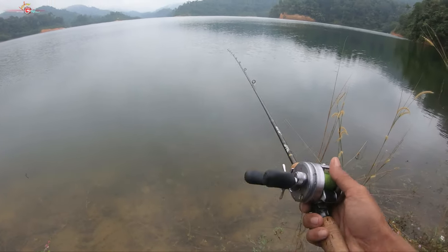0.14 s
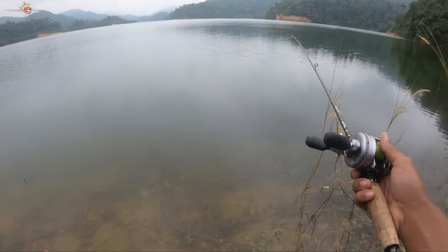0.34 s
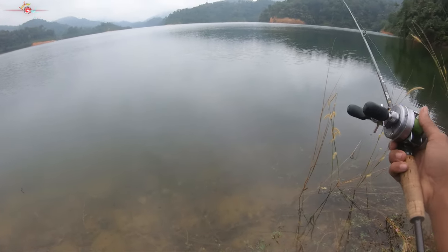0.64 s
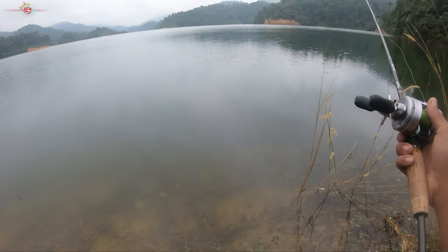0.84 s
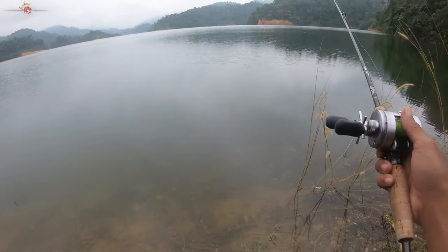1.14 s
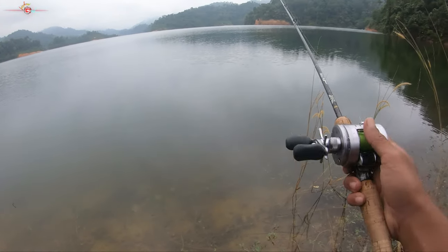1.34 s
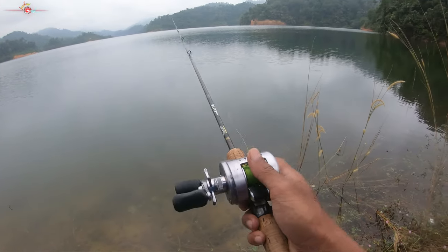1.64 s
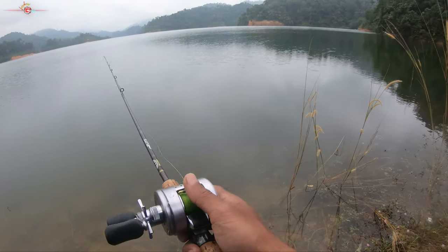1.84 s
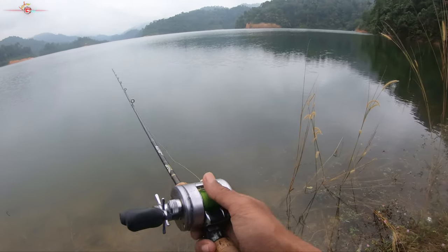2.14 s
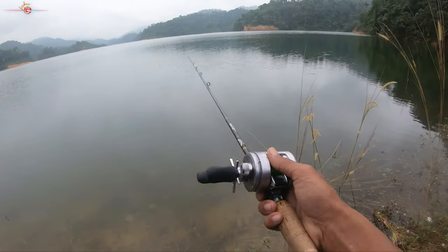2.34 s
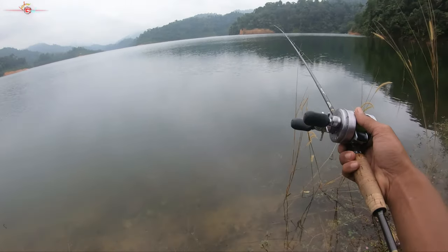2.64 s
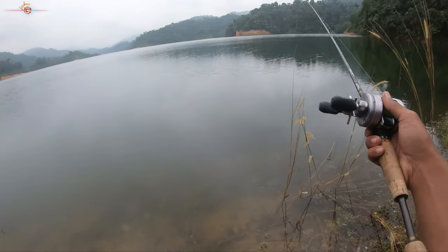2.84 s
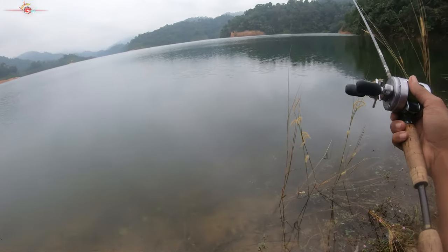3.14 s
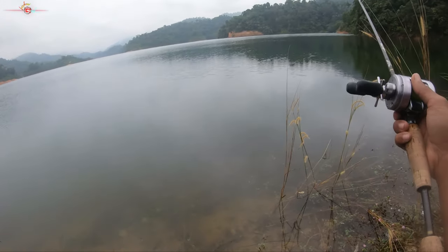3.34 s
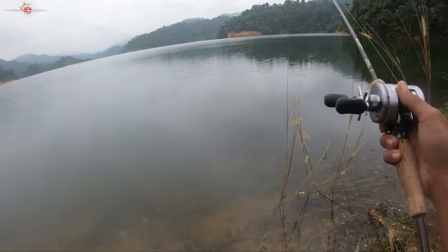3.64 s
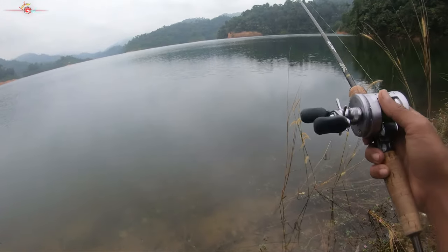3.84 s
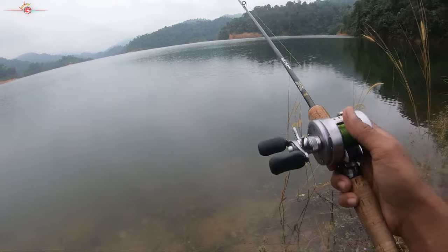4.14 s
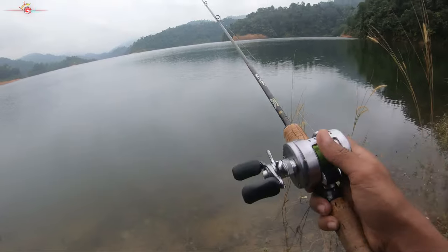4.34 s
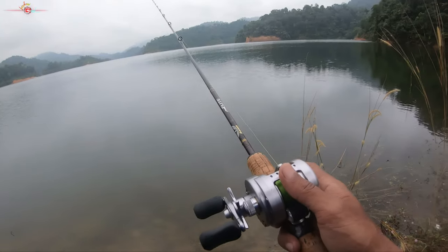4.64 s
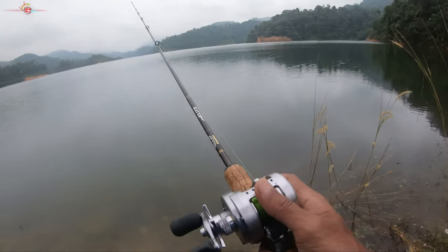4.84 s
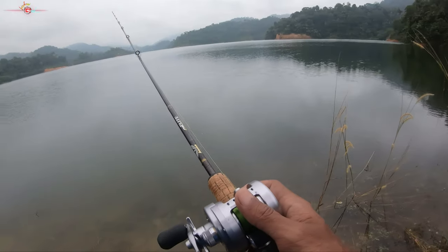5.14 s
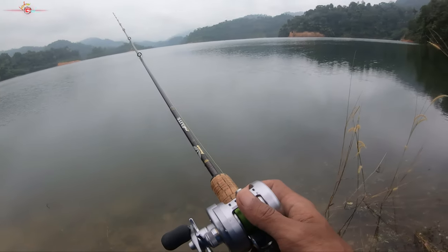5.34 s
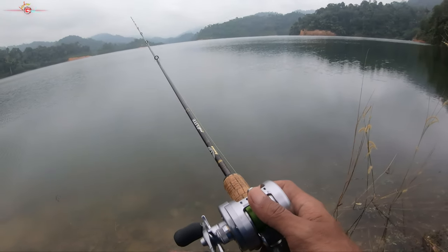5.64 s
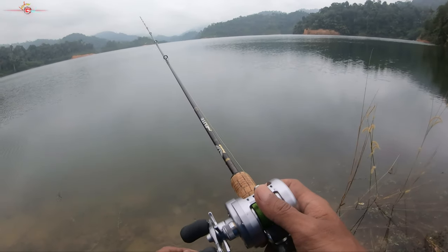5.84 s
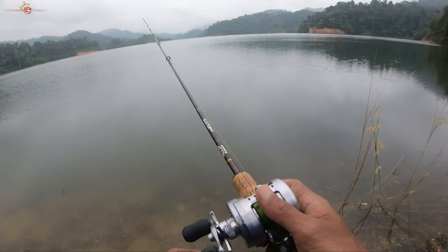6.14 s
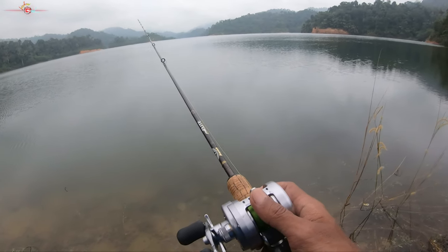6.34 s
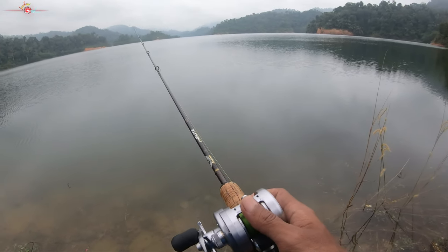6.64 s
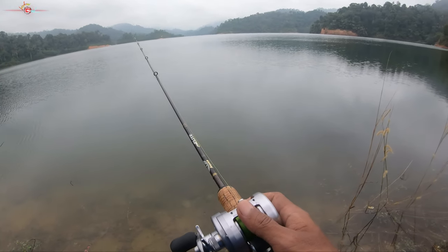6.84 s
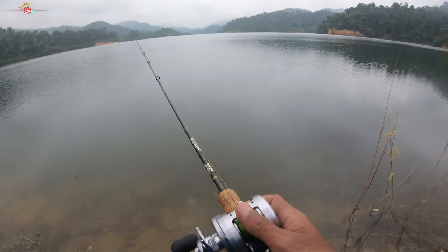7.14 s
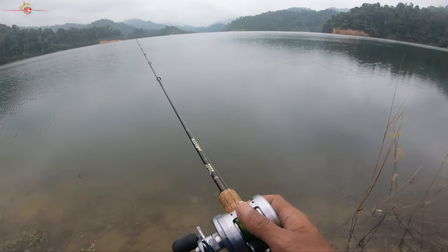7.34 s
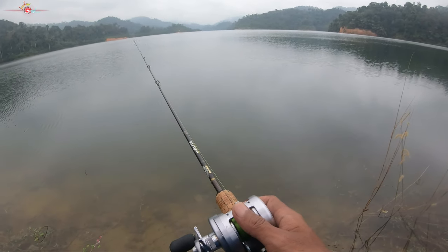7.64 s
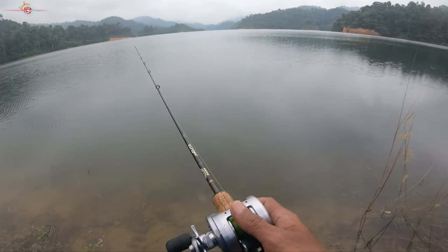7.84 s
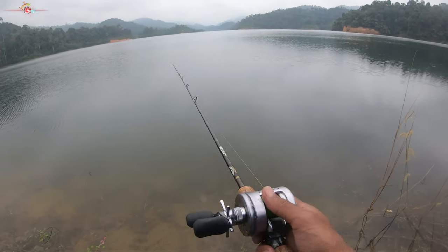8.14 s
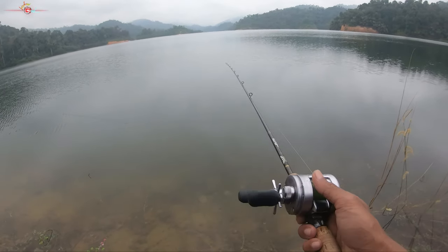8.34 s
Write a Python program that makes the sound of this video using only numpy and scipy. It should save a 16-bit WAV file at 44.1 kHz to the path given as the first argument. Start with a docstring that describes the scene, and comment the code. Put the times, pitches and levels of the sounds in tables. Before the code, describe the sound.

Outdoors by still water, small joints of fishing gear slip and click close up while cloth swishes past. The creaking is busy in the first four and a half seconds; then a strap rubs and hard, bright snaps crack out, a close pair and a single. After a sparser stretch, one more snap sets off a brief coarse rasp. Dull heartbeat-like thumps lie underneath, and delicate high cricket trilling continues far behind.

```python
"""Creaks, four hard snaps, a short grinding rasp and cloth rubbing, close up, over a lake bank of trilling crickets.
An angler with a chest camera lifts and lowers a rod and reel; reel seat and camera mount slip, and each slip is
a noisy jerk plus a dying scrape ringing the modes of a joint or catch. These reach the two microphones out of step.
Low soft thumps, many in heartbeat-like pairs, come through the chest mount as damped sines; each snap adds a low jolt.
Cloth, strap, air and a far drone are shaped noise; crickets are trains of falling tones."""
import sys
import numpy as np
from scipy import signal
from scipy.fft import rfft, irfft, next_fast_len
from scipy.io import wavfile
from scipy.ndimage import map_coordinates

SR = 44100
rng = np.random.default_rng(int(sys.argv[2]) if len(sys.argv) > 2 else 0)


def put_to_file(sound):
    """Save the sound as 16-bit audio at rate SR, in the file named by the first command-line argument."""
    columns = np.atleast_2d(sound).T  # one column per channel
    safe = np.clip(columns, -1, 1)
    whole_steps = np.round(safe * 32767)
    wavfile.write(sys.argv[1], SR, whole_steps.astype(np.int16))


N = 374850

# hard snaps: (time [s], level [dB], ring [dB], brightness [dB])
SNAPS = [(5.1862, -20, 3.5, -0.5), (5.282, -22, 4, 0), (5.733, -20, 3.5, -2.5), (7.4645, -18.5, 1, -1)]
# modes of the slipping joint: (frequency [Hz], level [dB], t60 [s], lag at right microphone [s], left minus right [dB])
JOINT = [(177, -25.5, 0.045, 0.00082, 6.5), (935, -13, 0.0099, 0.00052, 4.5),
         (1238, -3, 0.0146, 0.00052, -0.5), (1485, -7.5, 0.015, 0.00044, 2.5),
         (1991, -4, 0.016, 0.00039, 0), (2890, -13, 0.0055, 0.00026, 3),
         (3280, -10.5, 0.012, 0.000257, 2.5), (5030, -5, 0.0027, 0.00027, 0.5),
         (6210, -2.5, 0.0056, .00033, 11.5), (8050, -10.5, 0.0018, 0.000273, 9.5),
         (9230, -11.5, .004, .00028, 2.5)]
# broad crackle of the rubbing faces: (frequency [Hz], level [dB])
CRUNCH = [(0, -70.5), (350, -24.5), (650, -20), (1100, 2.5), (2200, -5), (4000, -13.5), (6500, -2),
          (9000, -5.5), (11000, -15.5), (14000, -22.5), (16000, -29)]


def amp(db):
    """Decibels to gain."""
    return 10 ** (np.asarray(db) / 20)


def unit(x):
    """Scale to rms 1."""
    return x / np.sqrt(np.mean(x ** 2) + 1e-20)


def curves(rows):
    """One value per sample for each column after the time."""
    s, *cols = np.transpose(rows)
    return [np.interp(np.arange(N) / SR, s, c) for c in cols]


def wobble(rate_hz):
    """A smooth random curve with rate_hz knots a second."""
    knots = rng.standard_normal(int(N * rate_hz / SR) + 4)
    return map_coordinates(knots, [np.arange(N) * rate_hz / SR])


def filtered(x, response):
    """x times a response of frequency."""
    m = next_fast_len(N + 8192)
    return irfft(rfft(x, m) * response(np.fft.rfftfreq(m, 1 / SR)), m)[..., :N]


def rush(spectrum, alike):
    """Stereo noise of rms 1 with a given spectrum and left-right correlation."""
    f, db = np.transpose(spectrum)

    def colour(hz):
        return amp(np.interp(np.log(hz + 1), np.log(f + 1), db, -100, -100))

    mid, side = filtered(rng.standard_normal((2, N)), colour)
    turn = np.arccos(np.clip(alike, -1, 1)) / 2
    return unit(np.cos(turn) * mid + np.sin(turn) * np.array([side, -side]))


def widened(x):
    """The close microphone pair spreads diffuse sound: some bands of the left-right difference are boosted."""
    # stereo width: (frequency [Hz], side gain [dB])
    width = [(250, -0.5), (480, 5.5), (800, 9), (1250, 9), (2000, 2), (3000, -0.5), (4000, -3.5),
             (5000, 1.5), (5700, 5), (6500, 5.5), (7500, 0)]
    f, db = np.transpose(width)
    side = filtered((x[0] - x[1]) / 2, lambda hz: amp(np.interp(np.log(hz + 1), np.log(f), db)))
    return x.mean(axis=0) + np.array([side, -side])


def pan(db):
    """Left and right gains for a level difference."""
    return amp(np.array([[db], [-db]]) / 2)


def spread(x, lag_s):
    """A source off to one side reaches the right microphone lag_s later (earlier if negative)."""
    return filtered(x, lambda hz: np.array([np.ones_like(hz), np.exp(-2j * np.pi * hz * lag_s)]))


def add(out, s, sound):
    """Mix a short sound in at time s."""
    start = max(round(s * SR), 0)
    out[:, start:start + sound.shape[-1]] += sound[..., :N - start]


def swell_db(start_s, rise_s, hold_s, fall_s):
    """Rise, hold and fall of a rub, in dB under its top; the slopes run on past both ends."""
    fade_db = 19  # gained during the rise, lost during the fall
    t = np.arange(N) / SR - start_s
    return -fade_db * np.clip(np.maximum(1 - t / rise_s, (t - rise_s - hold_s) / fall_s), 0, 10)


def swell(start_s, rise_s, hold_s, fall_s, db):
    """The gain of one rub over time."""
    return amp(db + swell_db(start_s, rise_s, hold_s, fall_s))


def lake():
    """Faint open air and a far, slightly wavering drone, both shaped noise."""
    # open air over the lake: (frequency [Hz], level [dB])
    air_spectrum = [(20, -0.5), (50, -2), (110, -5), (300, -2.5), (450, -12.5), (600, -9), (780, -2.5),
                    (900, -7.5), (1100, -12), (1700, -14), (3000, -17), (4200, -18), (5500, -23.5),
                    (7000, -63)]
    # its course: (time [s], level [dB])
    air_level = [(0, -63), (1.2, -66.5), (2.3, -64.5), (4.3, -64), (6.4, -67), (8.5, -66.5)]
    # far low drone: (frequency [Hz], level [dB])
    drone_spectrum = [(90, -28), (125, -12), (150, 2.5), (190, 2), (240, -7), (330, -19), (500, -26.5)]
    # its course: (time [s], level [dB])
    drone_level = [(0.0, -67), (0.64, -61.5), (0.85, -65), (3.88, -67), (4.02, -59), (4.88, -67),
                   (5.04, -58.5), (6.6, -64), (7.15, -62), (8.5, -66)]
    air = amp(curves(air_level)[0]) * widened(rush(air_spectrum, alike=0.08))
    waver = amp(1.2 * wobble(15))
    return air + amp(curves(drone_level)[0]) * waver * rush(drone_spectrum, alike=0.24)


def cricket(hz, rate_hz, sweep, group, depth, sharp):
    """Wing strokes: each is a short falling tone; the strokes swell in groups."""
    strokes = np.cumsum(rate_hz * (1 + 0.025 * wobble(6))) / SR + rng.random()
    within = strokes % 1
    pitch_hz = hz * (1 + sweep * (0.5 - within) + 0.0087 * wobble(400))
    grouping = 1 + depth * np.sin(2 * np.pi * strokes / group)
    size = np.abs(np.sin(np.pi * within)) ** sharp * grouping * amp(2.5 * wobble(50))
    return unit(size * np.sin(2 * np.pi * np.cumsum(pitch_hz) / SR))


def insects(bush_gain_db=1):
    """Near crickets, as stroke trains, over the blurred noise chorus of many far ones that ebbs slowly."""
    # near insects: (time [s], tree cricket level [dB], bush cricket level [dB])
    near_level = [(0.0, -68.5, -71.5), (1.23, -65, -72), (2.46, -67.5, -67), (3.15, -66.5, -73.5),
                  (4.64, -62.5, -70), (6.06, -72, -75.5), (8.5, -72.5, -76.5)]
    # high chirper, which tires halfway: (time [s], level against the tree crickets [dB])
    chirp_level = [(4.8, -5.5), (5.4, -11)]
    # far chorus: (frequency [Hz], level [dB])
    chorus_spectrum = [(4000, -24), (5100, -10.5), (5650, 0.5), (6000, -11), (6550, 0), (7200, -6),
                       (8200, -14.5), (9200, -7), (10700, -10), (11500, -45), (12600, -40), (13500, -12.5),
                       (14400, -27.5), (16000, -56)]
    chorus_start_db, chorus_db_per_s = -62.5, -0.33
    tree_db, bush_db = curves(near_level)
    trill = spread(cricket(hz=6990, rate_hz=67.5, sweep=0.03, group=4, depth=0.55, sharp=3), lag_s=0.00002)
    second = spread(cricket(hz=6970, rate_hz=96, sweep=0.035, group=1.8, depth=0.96, sharp=2), lag_s=-0.000055)
    chirp = spread(cricket(hz=7520, rate_hz=29, sweep=0.084, group=2, depth=0.18, sharp=13), lag_s=0.00002)
    bush = spread(cricket(hz=10364, rate_hz=120, sweep=0.18, group=4.5, depth=0.054, sharp=1.3), lag_s=0.00002)
    trees = amp(0.5) * trill + amp(3) * second + amp(curves(chirp_level)[0]) * chirp
    near = amp(tree_db) * trees + amp(bush_db + bush_gain_db) * bush
    chorus_db = chorus_start_db + chorus_db_per_s * np.arange(N) / SR + 1.5 * wobble(20)
    return near + amp(chorus_db) * widened(rush(chorus_spectrum, alike=0.024))


def thumps(gain_db=1, t60_s=0.17):
    """Low soft thumps, many in heartbeat-like pairs, through the chest mount; each snap adds a low jolt."""
    # soft thumps: (time [s], level [dB], frequency [Hz])
    soft_thumps = [(0.315, -57, 60), (2.484, -58, 65), (3.975, -52, 70), (3.981, -50.5, 139),
                   (6.205, -51.5, 45), (6.564, -53, 33), (6.784, -49.5, 42), (7.119, -50, 30),
                   (7.326, -45, 35), (7.66, -56.5, 30), (7.855, -50, 39.4), (8.19, -53, 30),
                   (8.408, -46.5, 35)]
    jolt_db, jolt_hz, jolt_lead_s = -29.5, 56.3, 0.0043  # level is against the snap
    out, t = np.zeros((2, N)), np.arange(SR // 4) / SR
    jolts = [(s - jolt_lead_s, db + jolt_db, jolt_hz) for s, db, *_ in SNAPS]
    for s, db, hz in soft_thumps + jolts:
        tone = np.sin(2 * np.pi * hz * t - np.array([[0], [1.1]]))  # the right port lags in phase [rad]
        onset = 1 - np.exp(-t / 0.00364)
        add(out, s, pan(1.5) * amp(db + gain_db - 60 * t / t60_s) * tone * onset)
    return out


def strap(squeeze_db=-50.5, rub_db=-56, fizz_db=-56.5):
    """The strap drags across the housing, flexing its lowest mode, then rubbing its shell with a fine fizz."""
    # courses: (start [s], rise [s], hold [s], fall [s])
    squeeze_shape = (4.66, 0.18, 0.08, 0.75)
    rub_shape = (4.76, 0.23, 0.58, 0.65)
    fizz_shape = (4.45, 0.6, 0.2, 0.85)
    # spectra of flexing, rubbing and fibres on the shell: (frequency [Hz], level [dB])
    squeeze_spectrum = [(600, -42.5), (1000, -13), (1230, -5), (1400, -8), (1700, -18.5), (3000, -43.5)]
    rub_spectrum = [(100, -17), (250, 3), (500, -3.5), (800, 0), (1100, -4.5), (1700, -20.5), (3000, -47.5)]
    fizz_spectrum = [(3000, -26.5), (5000, -4.5), (6300, -1), (8200, -1), (10500, -3), (11500, -33.5),
                     (13500, -15), (16000, -51)]
    squeeze = swell(*squeeze_shape, squeeze_db) * rush(squeeze_spectrum, alike=-0.88)
    squeeze = squeeze * unit(amp(2.2 * wobble(120)))
    rub = swell(*rub_shape, rub_db) * rush(rub_spectrum, alike=-0.1)
    fizz = swell(*fizz_shape, fizz_db) * rush(fizz_spectrum, alike=-0.17)
    return squeeze + rub + fizz


def ringing(modes, ring_db, bright_db, scatter_db, detune, rise_s=0.0003):
    """Stereo answer to one slip: decaying modes, with the middle and upper ones offset by ring and brightness."""
    clock = np.arange(SR // 25) / SR
    out = np.zeros((2, len(clock)))
    for k, (hz, db, t60_s, lag_s, side_db) in enumerate(modes):
        tilt_db = np.interp(hz, [1550, 1850, 3600, 4700], [0, ring_db, ring_db, bright_db])
        mode_db = db + tilt_db + scatter_db * rng.normal()
        t = np.maximum(clock - np.array([[0], [lag_s]]), 0)  # the bending wave reaches the right microphone later
        phase = 2 * np.pi * hz * (1 + detune * rng.normal()) * t
        onset = 1 - np.exp(-(t / rise_s) ** 2)
        tone = unit(pan(side_db) * np.sin(phase) * onset * amp(-60 * t / t60_s))
        out += (-1) ** k * amp(mode_db) * tone
    return out / np.sqrt(np.sum(out ** 2) / 2)


def cloth(swish_gain_db=-1.5, grain_db=1.0, blur_hz=105, catch_db=-6):
    """A sleeve brushes by in strokes; its weave sings faintly, higher at speed, flutters and catches in tiny ticks."""
    # strokes: (start [s], rise [s], hold [s], fall [s], swish level [dB], hiss level [dB],
    #           weave pitch at full speed [Hz], weave level over the swish [dB])
    strokes = [(0.29, 0.093, 0.12, 0.22, -52.5, -54.5, 2350, -0.5),
               (0.52, 0.084, 0.28, 0.27, -63.5, -69, 2220, -9),
               (2.549, 0.19, 0.14, 0.65, -59, -62.5, 1880, -3),
               (3.853, 0.17, 0.052, 0.3, -62.5, -62, 2020, -18),
               (4.62, 0.24, 0.046, 0.4, -58, -60, 2100, -15.5),
               (4.85, 0.25, 0.24, 0.85, -60.5, -64.5, 2197, -0.5),
               (7.101, 0.065, 0.01, 0.07, -67.5, -74, 2000, -18),
               (7.601, 0.19, 0.02, 0.15, -74, -68.5, 2000, -18),
               (8.3, 0.23, 0.05, 0.2, -60.5, -69, 1990, -9)]
    # spectra: (frequency [Hz], level [dB])
    swish_spectrum = [(590, -45), (1000, -12.5), (1260, -8), (1630, -8.5), (1780, -1.5), (2080, -7.5),
                      (2270, -3.5), (2770, -9.5), (3000, -10), (3900, -55), (6600, -120)]
    hiss_spectrum = [(1500, -27), (2600, -14.5), (3350, 3.5), (4200, -1), (5500, -7.5), (8500, -12.5),
                     (10500, -13), (12000, -34.5), (16000, -63)]
    sag_per_db = 0.004  # share by which the weave's pitch drops for each dB that a stroke slows
    swish, hiss, weave = np.zeros((3, N))
    for start, rise, hold, fall, body_db, treble_db, weave_hz, weave_db in strokes:
        speed_db = swell_db(start, rise, hold, fall)
        speed = amp(speed_db)
        pitch_hz = weave_hz * np.exp(sag_per_db * speed_db)
        swish += amp(body_db) * speed
        hiss += amp(treble_db) * speed
        weave += amp(body_db + weave_db) * speed * np.sin(2 * np.pi * np.cumsum(pitch_hz) / SR)
    blur = unit(filtered(rng.standard_normal((2, N)), lambda hz: 1 / (1 + (hz / blur_hz) ** 2)))
    song = np.sqrt(2) * blur * weave
    snags = (rng.random(N) < 170 / SR) * rng.standard_normal(N)  # threads catch on the mount and ring it
    ring = ringing(JOINT, ring_db=1, bright_db=-8, scatter_db=1.5, detune=0.01)
    catches = amp(catch_db) * unit(signal.fftconvolve(ring, snags[None], axes=1)[:, :N])
    body = swish * (rush(swish_spectrum, alike=0.35) + catches) + song
    brush = amp(swish_gain_db) * body + hiss * rush(hiss_spectrum, alike=0.331)
    return brush * unit(amp(grain_db * wobble(300))) * pan(0.3)


def crunch(bright_db, t60_s):
    """A few milliseconds of broad crackle, different at each microphone; mean energy 1."""
    t = np.arange(SR // 25) / SR
    hz = np.fft.rfftfreq(len(t), 1 / SR)
    colour_db = np.interp(hz, *np.transpose(CRUNCH)) + np.interp(hz, [2500, 5500], [0, bright_db / 2])
    burst = irfft(rfft(rng.standard_normal((2, len(t)))) * amp(colour_db), len(t))
    burst = burst * amp(-60 * t / t60_s) * (1 - np.exp(-t / 0.00034))
    return burst / np.sqrt(np.sum(burst ** 2) / 2)


def slip(ring, db, scrape_db, scrape_t60_s, stutter):
    """One jerk that stutters briefly, then a dying scrape of tiny slips, all ringing the same modes."""
    t = np.arange(SR // 16) / SR
    grains = rng.standard_normal(len(t)) * amp(-60 * t / scrape_t60_s) * (1 - np.exp(-(t / 0.0014) ** 2))
    jerk = rng.standard_normal(len(t)) * amp(-60 * t / 0.0073)
    jerk *= stutter / np.linalg.norm(jerk)
    jerk[0] += 1
    click, scrape = (signal.fftconvolve(ring, force[None], axes=1) for force in (jerk, grains))
    sound = click / np.linalg.norm(click) + amp(scrape_db) * scrape / np.linalg.norm(scrape)
    return amp(db) * np.sqrt(2 * SR * 0.005) * sound  # level refers to 5 ms


def rasp(slips_per_s=5000, crunch_db=-6, shudder_db=-15):
    """The joint slides on: dense uneven slips grind through its modes over a crackle, and the housing shudders."""
    pressure = unit(amp(1.5 * wobble(330)))
    force = (rng.random(N) < slips_per_s / SR) * rng.standard_normal(N) * pressure
    ring = ringing(JOINT, ring_db=-4.5, bright_db=-9.5, scatter_db=-0.5, detune=0.0096)
    grind = unit(signal.fftconvolve(ring, force[None], axes=1)[:, :N])
    shudder = amp(shudder_db) * rush([(50, -14.5), (130, -1.0), (200, -4.5), (350, -27.5)], alike=0.33)
    crackle = amp(crunch_db) * pressure * rush(CRUNCH, alike=0.1)
    slide = swell(start_s=7.461, rise_s=0.007, hold_s=0.052, fall_s=0.03, db=-38.5)  # around the last snap
    return slide * unit(grind + shudder + crackle)


def snaps(crunch_db=-15):
    """A stiff catch lets go at once, nearly alike every time."""
    # modes of the catch: (frequency [Hz], level [dB], t60 [s], lag at right microphone [s], left minus right [dB])
    catch_modes = [(178, -31.5, .04, .0004, 1.5), (840, -19.5, 0.0023, 0.00062, -2),
                   (1207, -0.5, 0.01, 0.00063, 1.5), (1490, 1.5, 0.0055, 0.00039, 8),
                   (1980, 1, .011, 0.00042, 1), (3504, -7.5, 0.0075, .00062, 2),
                   (5140, -3, 0.0015, 0.000525, -7.5), (6790, -4.5, .006, 0.00065, 14),
                   (7880, -8.5, 0.0081, 0.00032, 14.5), (9000, -33, 0.0033, .0005, 0)]
    out = np.zeros((2, N))
    for s, db, ring_db, bright_db in SNAPS:
        ring = ringing(catch_modes, ring_db, bright_db, scatter_db=1.0, detune=0.0054)
        ring = ring + amp(crunch_db) * crunch(bright_db, t60_s=0.0045)
        add(out, s, slip(ring, db, scrape_db=-16, scrape_t60_s=0.035, stutter=0.13))
    return out


def faint_slips(per_s=8.3, spread_db=2.5, ring_db=-7.5, bright_db=-13, scrape_db=0):
    """Rows like those of the clear slips, scattered at random through spells in which the moving rod creaks."""
    # spells: (from [s], to [s], typical level [dB])
    creaking = [(0.423, 0.621, -44.5), (2.1, 2.618, -54.5), (4.4, 5.101, -50)]
    rows = []
    for start, end, db in creaking:
        count = max(round((end - start) * per_s), 1)
        for k, (place, size) in enumerate(rng.random((count, 2))):
            s = start + (end - start) * (k + place) / count
            rows.append((s, db + spread_db * (2 * size - 1), ring_db, bright_db, scrape_db))
    return rows


def ticks(gain_db=-0.14, crunch_db=-11):
    """The gear creaks in single slips of its joint as the rod moves."""
    # clear slips: (time [s], level [dB], ring [dB], brightness [dB], after-scrape [dB])
    clear_slips = [(0.1876, -44, -5, -10, -9), (0.3276, -40.5, -4, -26, -22), (0.401, -39, -3, -20, -8),
                   (0.5318, -39.5, 8, -18, -1.5), (0.5368, -24, -13, -14.5, -8.5),
                   (0.572, -32.5, -6.5, -12.5, 5.5), (0.5796, -34.5, -9, -9, -6),
                   (0.6114, -36, -3, -10, -1.5), (0.733, -29.5, -4.5, -7, -10), (1.7504, -41, -1, -7, -2),
                   (1.836, -48, -4, 4, -8), (2.3323, -49, -11, -22, -17), (2.4539, -48.5, -10.5, -9, -7),
                   (2.6294, -24.5, -11.5, -10.5, -9.5), (2.6674, -40.5, -3, -8, 0.5),
                   (2.673, -32.5, -5.5, -11, 0), (2.876, -30.5, -4, -8.5, -5.5),
                   (2.88, -28, -4, -10.5, -25), (2.9109, -36, -7.5, -16, -5), (3.133, -37.5, -3, -12, -2),
                   (3.1362, -33.5, -5.5, -15, -13), (3.278, -38, -11.5, -10.5, -8),
                   (3.4197, -36, -9, -7, -7.5), (3.7417, -48, -14, -25, -8), (3.8337, -47, -11, -14, 2),
                   (3.9047, -41.5, -7.5, -10, -3), (3.979, -47, -1, 5, 2.5), (4.011, -36, -13, -19, -13),
                   (4.0642, -36.5, -7, -19, -13), (4.139, -34, 2.5, -4.5, -11.5),
                   (4.3278, -30.5, -1, -6.5, -15.5), (4.3912, -38.5, -11, -14, -8),
                   (4.4738, -32.5, -6, -7.5, -8.5), (4.5733, -33.5, -0.5, -6.5, -6.5),
                   (4.65, -33.5, -4, -15, -13), (4.902, -49.5, 7, -15, 5), (5.0521, -32, -9, -14, -7),
                   (5.464, -34, -19.5, -16, -7.5), (5.75, -39, -9, -13.5, -4),
                   (6.2137, -28, -5.5, -18.5, -15.5), (7.454, -44, -5, -3, 1.5),
                   (7.5161, -30.5, -10.5, -14, -4), (8.3252, -42, -3, -27, -14.8)]
    out = np.zeros((2, N))
    for s, db, ring_db, bright_db, scrape_db in clear_slips + faint_slips():
        ring = ringing(JOINT, ring_db, bright_db, scatter_db=0.5, detune=0.027)
        ring = ring + amp(crunch_db) * crunch(bright_db, t60_s=0.013)
        add(out, s, slip(ring, db + gain_db, scrape_db, scrape_t60_s=0.071, stutter=0.74))
    return out


def scene():
    """Everything at the two microphones."""
    return lake() + insects() + thumps() + strap() + cloth() + rasp() + snaps() + ticks()


def record(dry):
    """The ports dull a band near 12 kHz and the sound towards 16 kHz; the camera keeps nothing above its limit."""
    top_hz = 16000

    def ports(hz):
        return amp(np.interp(hz, [10700, 12200, 13440, 16100], [0, -12, -1, -17.0]))

    return filtered(dry, lambda hz: ports(hz) * (hz < top_hz))


dry = scene()
out = record(dry)
put_to_file(out)
```